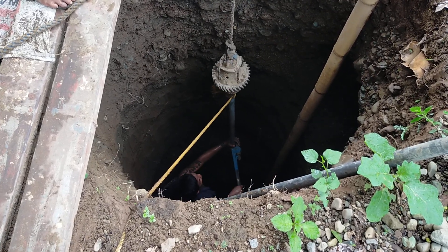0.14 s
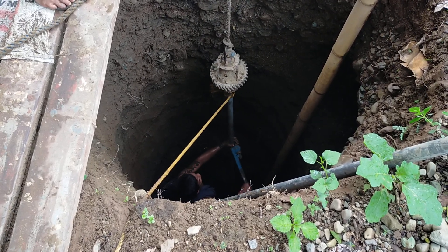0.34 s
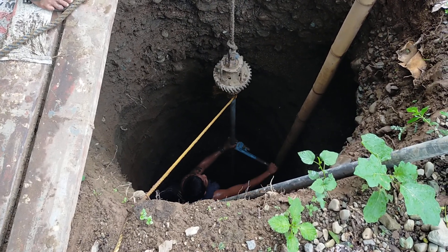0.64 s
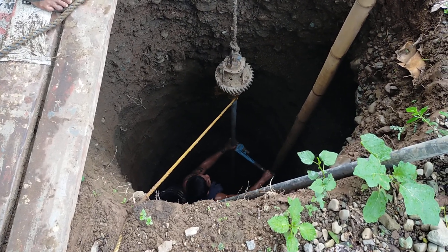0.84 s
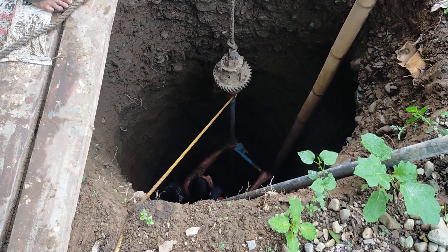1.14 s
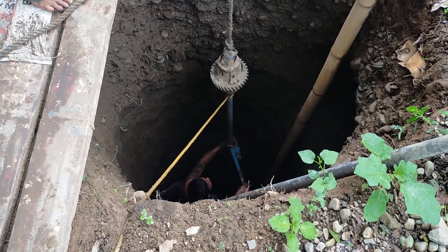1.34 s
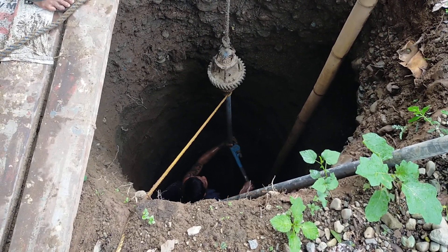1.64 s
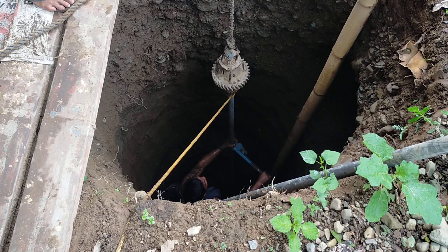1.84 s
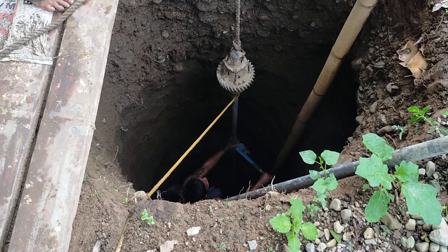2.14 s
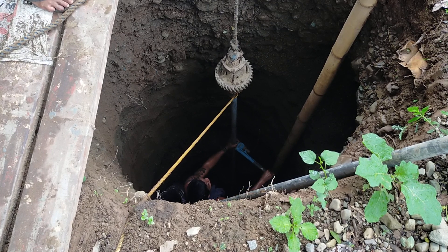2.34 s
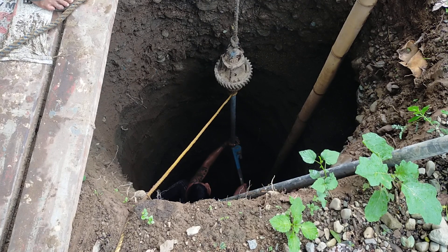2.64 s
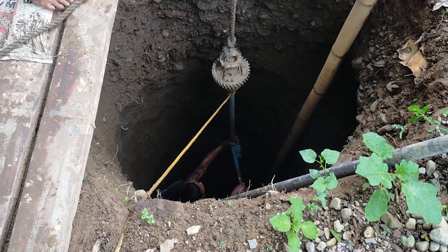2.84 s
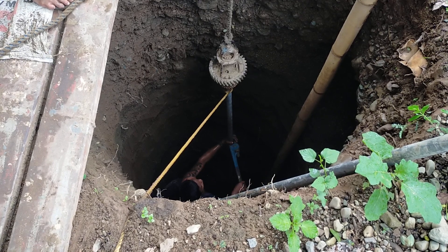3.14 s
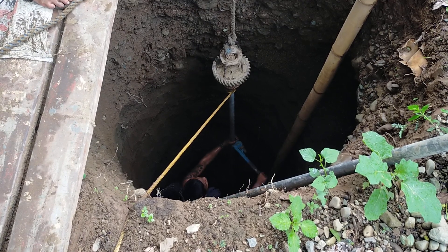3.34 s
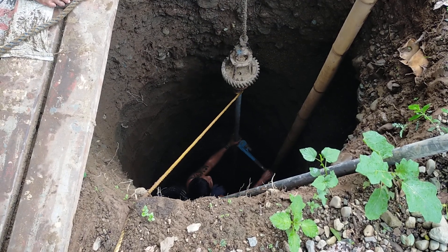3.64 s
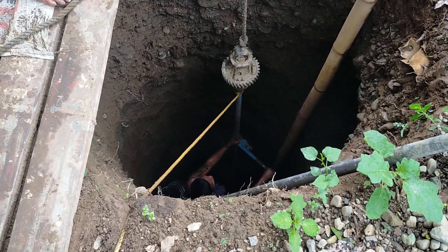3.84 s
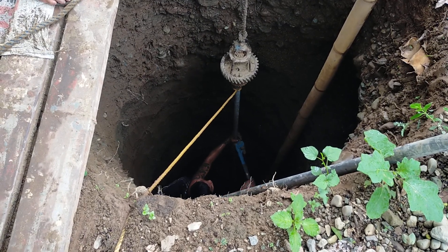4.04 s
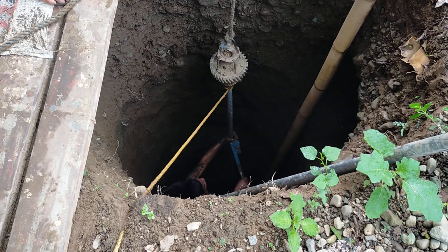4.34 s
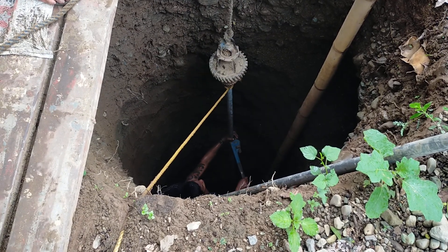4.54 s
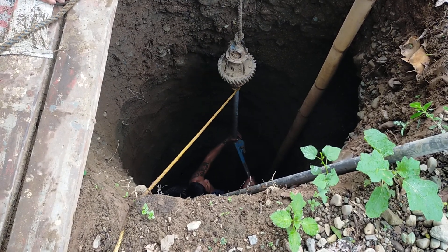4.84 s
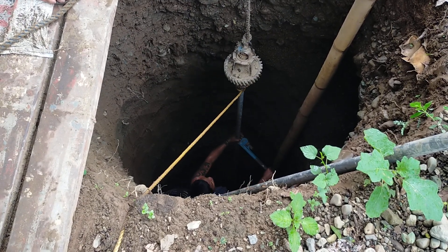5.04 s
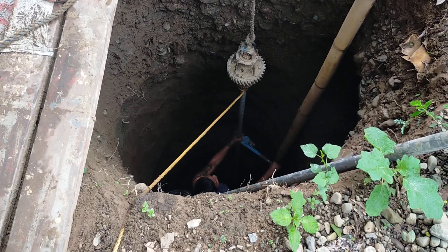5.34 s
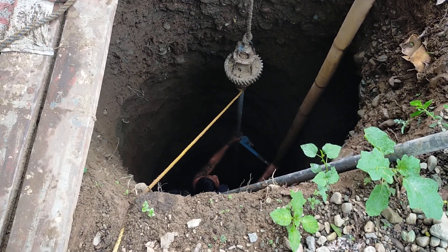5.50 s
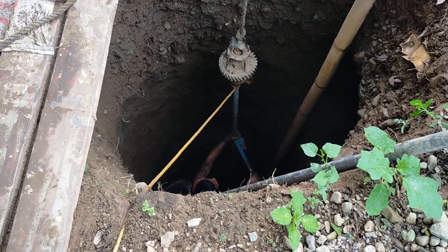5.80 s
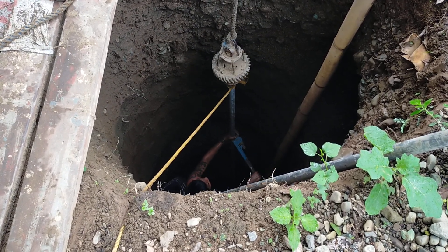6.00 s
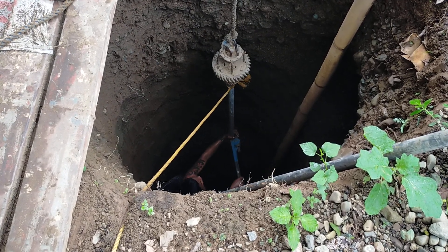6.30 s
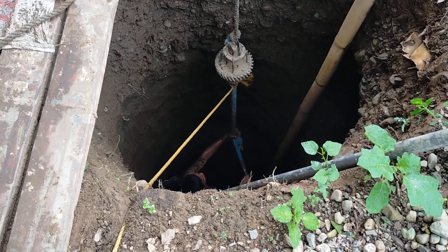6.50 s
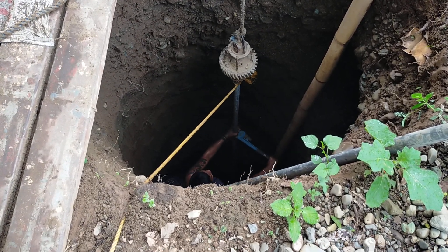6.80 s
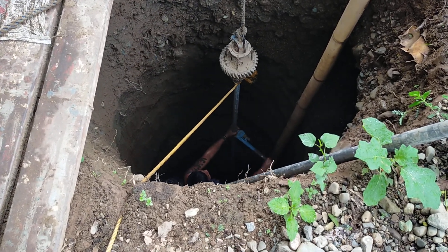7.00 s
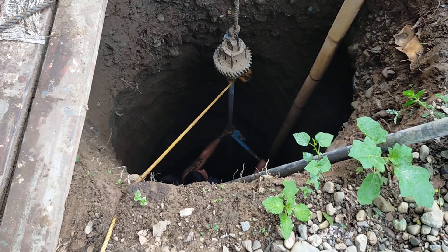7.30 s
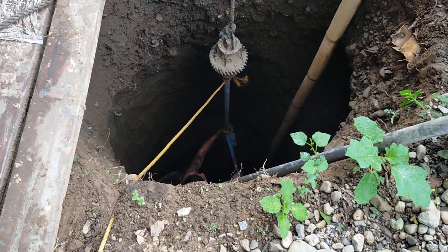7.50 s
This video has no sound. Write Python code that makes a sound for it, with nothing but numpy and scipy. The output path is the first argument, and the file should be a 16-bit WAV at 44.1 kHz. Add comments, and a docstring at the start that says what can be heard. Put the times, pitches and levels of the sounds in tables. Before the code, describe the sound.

A wrench clanks and ratchets on a steel pipe in an earth pit, in uneven metallic bursts over faint engine and insect hiss.

```python
"""A wrench ratchets on a steel pipe down in an earth pit: each clank sprays noise round the pit and rings the
steel. Spray is shaped noise; the ring is a sum of decaying modes, some of which sing on alone. Ticks and grit
are bright noise bursts; hollow knocks are short noise through hollow resonances. A distant one-cylinder engine
hunts, each firing a thump and a pipe ring; insects hiss as amplitude-modulated noise over the open-air wash,
and something chirps faintly in falling tones."""
import sys
import numpy as np
from scipy import signal
from scipy.fft import rfft, irfft
from scipy.io import wavfile
from scipy.ndimage import uniform_filter1d

SR = 44100
rng = np.random.default_rng(int(sys.argv[2]) if len(sys.argv) > 2 else 0)


def to_wav(sig):
    """Store sig (one row per channel, or 1-D mono) as 16-bit WAV at the path in sys.argv[1].

    Samples outside -1..1 are clipped; the rate is SR.
    """
    pcm = np.clip(np.atleast_2d(sig), -1, 1) * 32767
    pcm = np.round(pcm).astype(np.int16)
    wavfile.write(sys.argv[1], SR, pcm.T)  # frames by channels


N = 337786  # length in samples

# Clanks of jaw on pipe: start_s, peak_db, decay_s (scales the decay of spray and ring)
CLANKS = [(0.011, -34.5, 0.62), (0.085, -19, 0.34), (0.154, -25.5, 0.04), (0.325, -22, 0.37),
          (0.418, -27.5, 0.5), (0.435, -30, 0.71), (0.632, -22, 0.12), (0.734, -10.5, 0.22),
          (0.819, -11.5, 0.35), (0.934, -23, 0.45), (0.983, -8, 0.35), (1.072, -21.5, 0.16),
          (1.108, -21.5, 0.53), (1.182, -33, 0.16), (1.254, -32, 0.16), (1.317, -25, 0.28),
          (1.342, -24, 0.28), (1.407, -20.5, 0.2), (1.434, -22, 0.46), (1.618, -26.5, 0.17),
          (1.709, -27, 0.99), (1.877, -31.5, 0.21), (1.961, -25.5, 0.12), (1.978, -26, 0.23),
          (2.022, -13, 0.72), (2.087, -8, 0.45), (2.212, -13.5, 0.32), (2.239, -16, 0.25),
          (2.298, -13.5, 0.35), (2.348, -6, 0.56), (2.549, -31, 0.48), (2.593, -16, 0.63),
          (2.613, -20, 0.64), (2.714, -15, 0.36), (2.806, -18.5, 0.42), (2.837, -8, 0.44),
          (2.93, -23.5, 0.28), (3.07, -35, 0.19), (3.156, -21, 0.47), (3.216, -26, 0.23), (3.354, -25, 1),
          (3.479, -22, 0.29), (3.529, -8, 0.25), (3.595, -15, 0.2), (3.62, -16, 0.43), (3.711, -17.5, 0.32),
          (3.727, -19.5, 0.52), (3.776, -16, 0.66), (3.8, -19, 1), (3.851, -21.5, 0.061),
          (3.898, -25, 0.35), (3.95, -19, 0.2), (4.033, -18.5, 0.9), (4.046, -15, 0.15),
          (4.059, -17.5, 0.43), (4.084, -28, 0.28), (4.136, -11, 0.19), (4.224, -18.5, 0.19),
          (4.256, -22, 0.34), (4.281, -25.5, 0.47), (4.37, -32, 0.52), (4.493, -33, 0.11),
          (4.539, -26.5, 0.6), (4.815, -32.5, 0.37), (4.946, -29, 0.32), (5.022, -34, 0.77),
          (5.268, -13, 0.6), (5.326, -22, 1), (5.444, -14.5, 0.64), (5.507, -12, 0.51), (5.571, -8, 0.51),
          (5.683, -12, 0.29), (5.748, -22, 0.95), (5.78, -20.5, 0.8), (5.852, -27.5, 0.069),
          (5.882, -23, 0.74), (5.962, -10.5, 0.53), (6.031, -25, 0.41), (6.101, -27.5, 0.62),
          (6.244, -37, 0.4), (6.343, -24, 0.65), (6.376, -25, 0.26), (6.532, -20, 0.33), (6.664, -20, 0.4),
          (6.74, -30.5, 0.44), (6.863, -22, 0.25), (6.939, -13.5, 0.43), (7.081, -31.5, 0.82),
          (7.175, -16, 0.4), (7.249, -10.5, 0.45), (7.413, -18, 0.79), (7.546, -28.5, 0.36),
          (7.559, -22, 0.37), (7.579, -20.5, 0.18), (7.64, -14, 0.62)]
# Strong steel modes: pitch_hz
STEEL_HZ = [722, 902, 985, 1290, 1572, 1872, 1978, 2048, 2230, 2256, 2354, 2639, 2946, 3125, 3464, 3522,
            3975, 4490, 5028, 6260]
# The same modes in the same order: relative level_db, t60_s (before any damping by the grip)
STEEL = [(-24, 1.48), (-9.5, 0.17), (-27, 3.3), (-6, 0.14), (-9, 0.43), (5, 0.14), (4.5, 0.14), (9, 0.035),
         (-7, 0.47), (-10.5, 0.49), (-5.5, 0.26), (-5, 0.23), (-3.5, 0.11), (-1.5, 0.11), (-11, 0.44),
         (-9.5, 0.16), (-12, 0.22), (-6.5, 0.14), (-37, 0.59), (-20, 0.54)]


def undb(db):
    """Decibel law: the amplitude gain of a dB value."""
    return 10 ** (np.asarray(db) / 20)


def level(x, db):
    """Mean-square level: scale each row to an rms in dB."""
    rms = np.sqrt(np.mean(x ** 2, axis=-1, keepdims=True))
    return x * undb(db) / rms


def noise(shape, points, tilt_db=0., peaky_db=0.):
    """Spectral shaping: rms-1 noise with a (Hz, dB) spectrum, a tilt per octave and random narrow peaks."""
    size = shape[-1]
    octave = np.log2(np.maximum(np.fft.rfftfreq(size, 1 / SR), 1))
    hz, db = np.transpose(points)
    gain_db = np.interp(octave, np.log2(hz), db, left=-80)
    # the tilt pivots at 2 kHz and stops 1.5 octaves either side
    gain_db = gain_db + tilt_db * np.clip(octave - np.log2(2000), -1.5, 1.5)
    bins = max(size // 512, 1)  # width of a random peak
    peaks = uniform_filter1d(rng.standard_normal(shape[:-1] + octave.shape), bins)
    gain_db = gain_db + peaky_db * np.sqrt(bins) * peaks
    white = rfft(rng.standard_normal(shape))
    return level(irfft(white * undb(gain_db), size), 0)


def band(x, hz, width):
    """Resonance: a two-pole filter with gain 1 at its centre and a bandwidth in Hz."""
    return signal.lfilter(*signal.iirpeak(hz, hz / width, fs=SR), x)


def walk(rate):
    """Slow random modulation: levels held 1 / rate s and slewed twice; spread near 1."""
    k = int(SR / rate)
    held = np.repeat(rng.standard_normal(N // k + 1), k)
    return 1.3 * uniform_filter1d(uniform_filter1d(held, k), k)[:N]


def place(times, sounds):
    """Superposition: add each row of sounds at its time."""
    out = np.zeros(N + SR)
    for s, sound in zip(times, sounds):
        start = int(s * SR)
        out[start:start + len(sound)] += sound
    return out[:N]


def fall(t, t60, rise):
    """Exponential decay: a quick rise, then 60 dB down in t60."""
    return (1 - np.exp(-t / rise)) * np.exp(-np.log(1000) * t / t60)


def grains(shape, spread_db, size=128):
    """Granular modulation: a gain that steps to a random level every size samples, edges smoothed; rms 1."""
    steps = rng.exponential(size=(shape[0], shape[1] // size))
    held = np.repeat(undb(spread_db * steps), size, axis=1)
    return level(uniform_filter1d(held, size // 2), 0)


def outdoors():
    """Amplitude modulation: open-air wash that swells a little, and an insect noise band buzzing fast."""
    # Spectrum of the air: pitch_hz, relative level_db per Hz
    air_spectrum = [(25, 2), (60, -1), (120, -3), (300, -9), (550, -10), (800, -17), (2200, -10),
                    (3500, -24), (6000, -32), (9000, -23), (15000, -20)]
    air_db, insect_db = -57.5, -62  # rms about which each swells
    air = noise((N,), air_spectrum) * undb(air_db + 1.2 * walk(3.5))
    chorus = band(band(rng.standard_normal(N), 7690.0, 600.0), 7600.0, 750.0)
    buzz_hz = 370 + 15 * walk(25)
    buzz = 1 + 0.19 * np.sin(2 * np.pi * np.cumsum(buzz_hz) / SR)
    return air + level(chorus * buzz, insect_db) * undb(1.3 * walk(9.1))


def thicket(count=48):
    """Modal density: lesser modes of pipe and wrench scattered through the middle; Hz and t60 in s."""
    hz_chance, t60_chance = rng.standard_normal((count, 2)).T
    return np.linspace(680, 5300, count) + 30 * hz_chance, .36 * np.exp(.4 * t60_chance)


def clank(times, db, t60, minor, size=16384):
    """Modal excitation: a blow sprays noise and wakes strong and lesser modes, each time differently."""
    # Colour of a clank as it leaves the pit: pitch_hz, relative level_db per Hz
    clank_spectrum = [(200, -19.5), (600, -19), (873, -12), (1480, -6), (1950, -6), (2800, -7), (3050, -9),
                      (4220, -15), (4600, -21.5), (5840, -31.5), (6480, -17), (12000, -32), (16500, -32)]
    spray_db, ring_db = -10, 1  # spray gain; lift of the strong modes
    t = np.arange(size) / SR
    t60 = np.clip(t60, .04, .8)[:, None]
    tilt_db = 0.16 * (db[:, None] + 12.5)  # harder blow, brighter sound

    spray = noise((len(times), size), clank_spectrum, tilt_db, peaky_db=4.0)
    spray = spray * fall(t, .6 * t60, .0004) * undb(spray_db)
    spray = spray * grains(spray.shape, 0.94)

    steel_db, steel_t60 = np.transpose(STEEL)
    minor_hz, minor_t60 = minor
    colour_hz, colour_db = np.transpose(clank_spectrum)
    minor_db = np.interp(np.log(minor_hz), np.log(colour_hz), colour_db) - 1.5
    hz = np.r_[STEEL_HZ, minor_hz]
    mode_db = np.r_[steel_db + ring_db, minor_db]
    ring_t60 = np.r_[steel_t60, minor_t60]

    # a complex gain gives each mode a random strength and phase
    chance = rng.standard_normal((len(times), len(hz), 2))
    gain = undb(mode_db + tilt_db * np.log2(hz / 2000)) * (chance[..., 0] + 1j * chance[..., 1])
    bank = np.exp(2j * np.pi * hz[:, None] * t) * fall(t, ring_t60[:, None], 0.0014)
    # the grip of hand and jaw damps all modes alike
    ring = (gain @ bank).imag / 4.33 * fall(t, 1.29 * t60, 0.000067)
    ring = ring * grains(ring.shape, 0.8, size=1024)

    blow = spray + ring
    peak = np.abs(blow).max(axis=1, keepdims=True)
    return place(times, blow / peak * undb(db)[:, None])


def rattle(minor, count=2):
    """Repeated impact: the loose jaw rebounds after each clank and chatters faintly at random times."""
    times, db, _ = np.repeat(CLANKS, count, axis=0).T
    delay, loss, when, strength = rng.random((len(times), 4)).T
    rebound_db = db - 13.0 - 6.0 * loss
    rebound = clank(times + .015 + .07 * delay, rebound_db, 0 * db + 0.06, minor, size=4096)
    chatter_db = -45 + 6.0 * strength
    return rebound + clank(when * N / SR, chatter_db, 0 * db + 0.27, minor, size=4096)


def engine(size=8192):
    """Pulse excitation: each firing thumps and rings the exhaust pipe, louder under load, higher at speed."""
    # Distant engine speed: time_s, firings_per_s
    speed = [(0, 21.07), (.28, 23.63), (.49, 19.62), (.65, 21.56), (1.12, 10.82), (1.54, 17.55),
             (2.15, 10.58), (3, 12.69), (3.5, 21.87), (4.12, 12.78), (4.54, 22.21), (5.01, 15.3),
             (5.75, 11.24), (5.98, 12.84), (6.45, 20.03), (7.12, 17.01), (7.29, 20.34), (7.66, 23.96)]
    # Engine load, heard as mean exhaust ring: time_s, rms level_db
    load = [(0, -48.5), (.6, -50), (1.1, -59.5), (1.45, -55), (2, -62.5), (3.5, -53.5), (4.12, -52.5),
            (4.5, -44.5), (4.86, -48), (5.15, -56.5), (5.7, -59), (6.2, -50), (7.66, -53)]
    # Exhaust resonances: pitch_hz (at 21 firings per s), t60_s, relative level_db
    exhaust = [(121.7, 0.098, 3.5), (236.2, 0.068, 0.5)]
    first_turn = .756  # part of a cycle already turned at the start
    # loudest mean thump, its speed, loss per (firing/s) squared
    thump_peak_db, thump_best_per_s, thump_droop_db = -53.5, 16.7, 0.26

    rate = np.interp(np.arange(N) / SR, *np.transpose(speed))
    at = np.flatnonzero(np.diff(np.floor(first_turn + np.cumsum(rate) / SR)))  # a firing per whole cycle
    fired = rate[at, None]
    t = np.arange(size) / SR
    warm = (fired / 21) ** 0.5  # pitch factor
    pipe = sum(undb(db) * np.sin(2 * np.pi * hz * warm * t) * fall(t, t60, .009) for hz, t60, db in exhaust)
    soft_start = np.sin(np.pi * np.clip(t / .024, 0, .5))
    thump = np.sin(2 * np.pi * 72 * t) * fall(t, .08, .008) * soft_start

    pipe_db = np.interp(at / SR, *np.transpose(load))[:, None]
    thump_db = thump_peak_db - thump_droop_db * (fired - thump_best_per_s) ** 2
    scatter_db = rng.standard_normal((len(at), 2)) * [2.2, 2.6]
    # levels are rms over one cycle
    pipe = pipe / np.sqrt(np.sum(pipe ** 2, axis=-1, keepdims=True) * fired / SR)
    thump = thump / np.sqrt(np.sum(thump ** 2, axis=-1, keepdims=True) * fired / SR)
    pipe = pipe * undb(pipe_db + scatter_db[:, :1])
    thump = thump * undb(thump_db + scatter_db[:, 1:])
    return place(at / SR, pipe + thump)


def ticks(size=8192, count=90):
    """Transient radiation: a sharp click and a gritty bright tail; tiny grains tick at random in between."""
    # Bright ticks of teeth and grit: start_s, level_db (before the envelope)
    tooth_ticks = [(0.8205, -26.5), (0.9852, -22), (2.0248, -17), (2.0882, -22), (2.2134, -28.5),
                   (2.3491, -19), (2.592, -33), (2.7162, -26.5), (2.8075, -32), (2.8414, -23.5),
                   (3.1582, -29.5), (3.5304, -19.5), (3.5947, -29.5), (3.8585, -30), (3.92, -35),
                   (4.0357, -32), (4.1385, -25.5), (4.2263, -29), (5.1272, -38), (4.85, -43), (4.94, -41),
                   (5.1951, -41), (5.2185, -23.5), (5.2709, -24.5), (5.3258, -29), (5.5069, -23.5),
                   (5.5712, -15.5), (5.685, -27), (5.9618, -24), (6.534, -27.5), (6.6662, -31.5),
                   (7.1766, -27.5), (7.2514, -13.5)]
    # Lone dry clicks of grit close by: start_s, level_db (before the envelope)
    dry_clicks = [(0.328, -33), (1.6038, -30), (1.901, -30), (4.7745, -35), (4.891, -28), (5.238, -16),
                  (5.35, -17), (5.4045, -27), (5.428, -13.5)]
    # Colour of the ticks: pitch_hz, relative level_db per Hz
    tick_spectrum = [(2000, -5), (5800, -18.5), (6500, -6.5), (9500, -13.5), (12000, -6.5), (14500, -5),
                     (15800, -6.5)]
    # Colour of clicks and grit: pitch_hz, relative level_db per Hz
    click_spectrum = [(4000, -24), (9000, -10), (16000, 0)]

    chance = rng.random((count, 2))
    grit = np.c_[chance[:, 0] * N / SR, -49 + 10.5 * chance[:, 1]]  # start_s, level_db
    times, db = np.transpose(np.r_[tooth_ticks, dry_clicks, grit])
    tick_count, dry_count = len(tooth_ticks), len(dry_clicks) + count
    tail_t60 = np.repeat([0.11, 0.03], [tick_count, dry_count])[:, None]  # s
    t = np.arange(size) / SR
    bright = noise((tick_count, size), tick_spectrum, peaky_db=3.0)
    dry_grit = noise((dry_count, size), click_spectrum, peaky_db=3.0)
    click = 0.72 * fall(t, 0.004, .0001)
    tail = 0.57 * fall(t, tail_t60, 0.0021) * grains((len(times), size), 1.4)
    return place(times, np.r_[bright, dry_grit] * (click + tail) * undb(db)[:, None])


def knocks(size=8192):
    """Noise filtered by resonance: short rough noise bursts in two hollow bands."""
    # Hollow knocks: start_s, length_s, level_db (rms before the swell and fade)
    hollow_knocks = [(0.142, 0.062, -45), (3.779, 0.14, -43), (7.2, 0.2, -49.5)]
    times, length, db = np.transpose(hollow_knocks)
    t = np.arange(size) / SR
    rough = rng.standard_normal((len(times), size))
    hollow = level(band(rough, 233.0, 37.0) + 0.29 * band(rough, 360.0, 66.0), 0)
    arch = np.sin(np.pi * np.clip(t / length[:, None], 0, 1))
    return place(times, hollow * arch * undb(db)[:, None])


def singing(size=16384):
    """Free vibration: lone modes outlast their blow, each with the decay of its steel mode."""
    # Blows after which the grip loosens and one mode sings on: start_s, pitch_hz, level_db
    sung_modes = [(.82, 3522, -30), (2.213, 1872, -20), (2.213, 2354, -28), (2.349, 902, -22),
                  (2.595, 2354, -22), (2.839, 2639, -18), (2.714, 4490, -31), (3.48, 3522, -28),
                  (3.53, 4490, -21), (4.07, 2256, -43), (4.137, 722, -50), (4.226, 1978, -29),
                  (4.226, 2256, -28.5), (4.25, 3522, -35), (5.268, 2946, -14), (5.509, 1872, -26),
                  (5.569, 2946, -10.5), (5.961, 2639, -25), (5.962, 2256, -29), (5.963, 1872, -21),
                  (6.351, 1872, -29), (6.665, 2230, -32.5), (6.665, 3464, -39)]
    times, hz, db = np.transpose(sung_modes)[:, :, None]
    mode = np.abs(hz - STEEL_HZ).argmin(axis=1)  # nearest steel mode
    hz = np.take(STEEL_HZ, mode)[:, None]
    t60 = np.array(STEEL)[mode, 1:]
    t = np.arange(size) / SR
    tone = np.sin(2 * np.pi * hz * t) * fall(t, t60, 0.0081)
    return place(times[:, 0], undb(db) * tone * grains((len(hz), size), 1.5, size=1024))


def chirps(size=2048):
    """Frequency modulation: short faint whistles that sag a little in pitch."""
    # Faint high chirps: start_s, pitch_hz (at the onset), level_db (before the envelope)
    whistles = [(6.163, 4370, -56), (6.212, 4430, -54)]
    times, hz, db = np.transpose(whistles)[:, :, None]
    t = np.arange(size) / SR
    tone = np.sin(2 * np.pi * hz * t * (1 - .6 * t)) * fall(t, 0.084, 0.0027)
    return place(times[:, 0], undb(db) * tone * grains((len(hz), size), 3.0))


def scene():
    """Superposition: all sources sum at one microphone on the rim."""
    minor = thicket()
    wrench = clank(*np.transpose(CLANKS), minor) + rattle(minor) + singing() + ticks() + knocks()
    return (wrench + engine() + outdoors() + chirps())[None]


def record(dry):
    """Band limiting: the recorder cuts the top steeply above 15750 Hz."""
    return signal.sosfilt(signal.ellip(10, .2, 85, 15750, fs=SR, output="sos"), dry)


dry = scene()
out = record(dry)
to_wav(out)
```